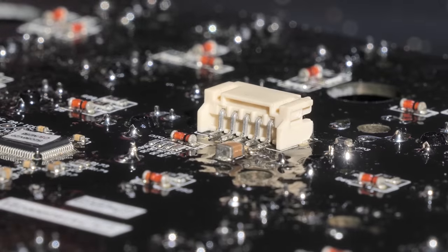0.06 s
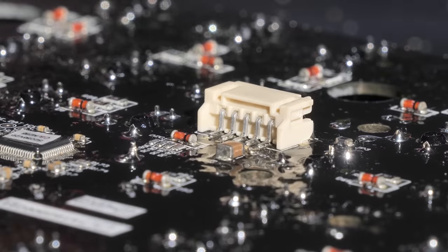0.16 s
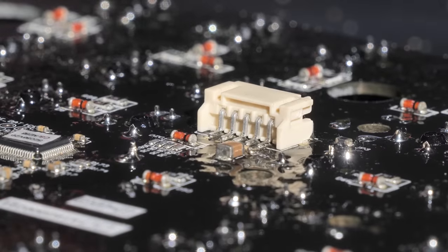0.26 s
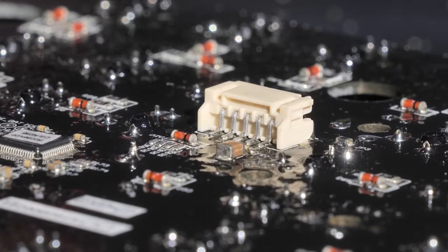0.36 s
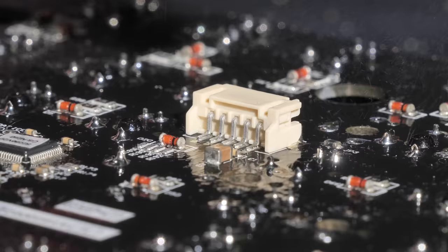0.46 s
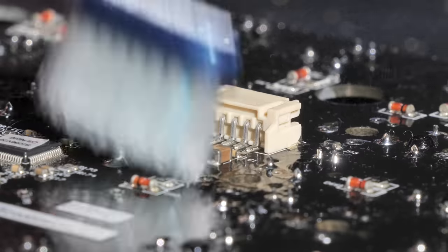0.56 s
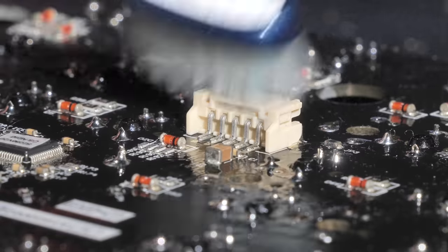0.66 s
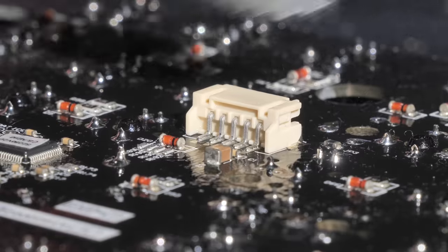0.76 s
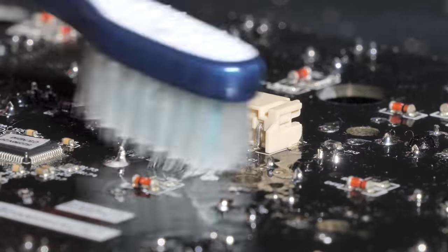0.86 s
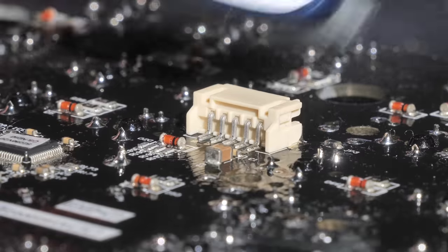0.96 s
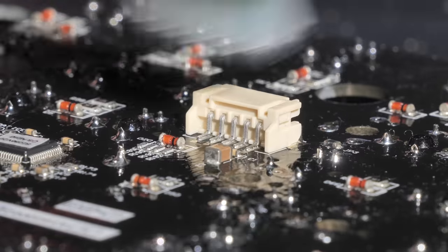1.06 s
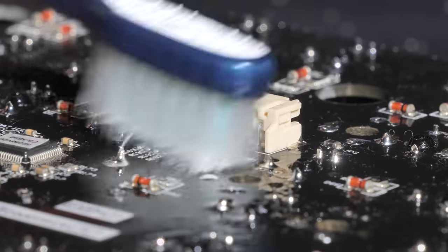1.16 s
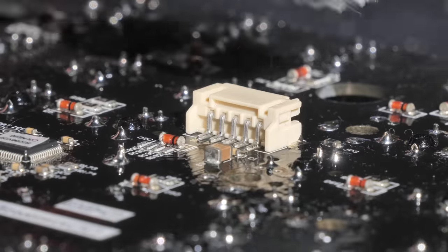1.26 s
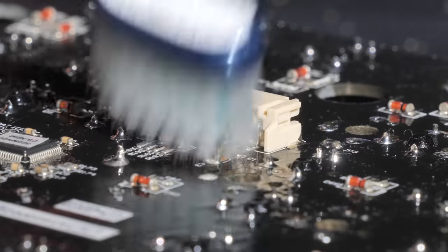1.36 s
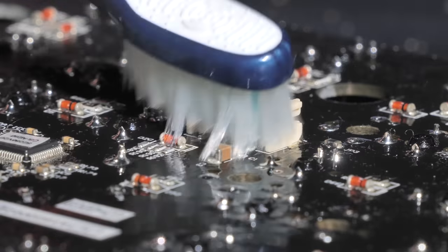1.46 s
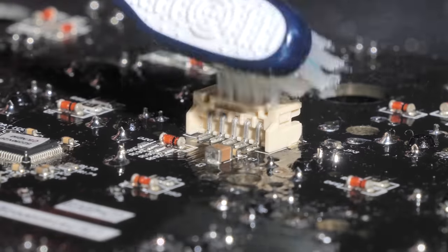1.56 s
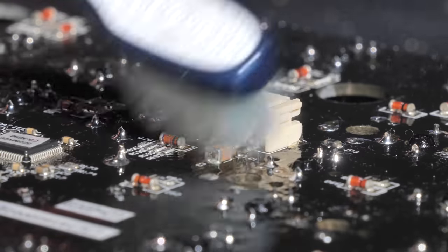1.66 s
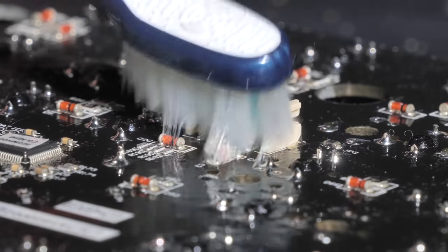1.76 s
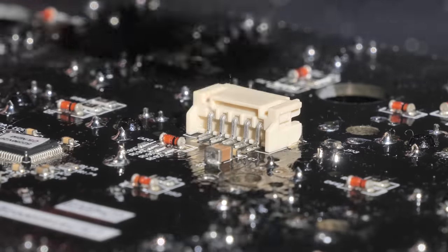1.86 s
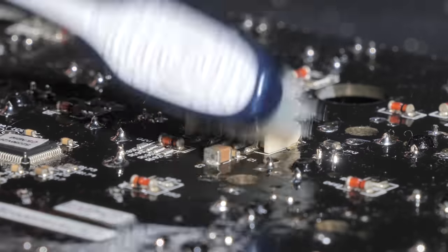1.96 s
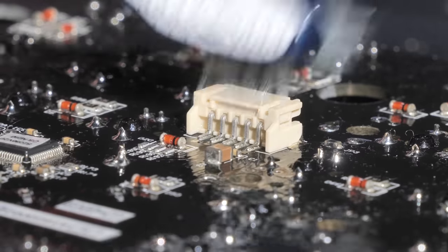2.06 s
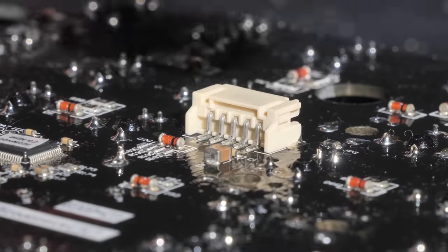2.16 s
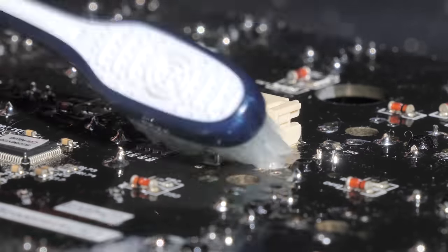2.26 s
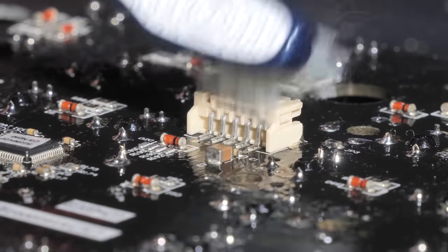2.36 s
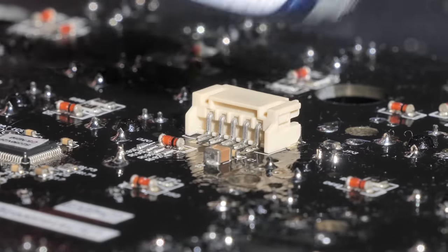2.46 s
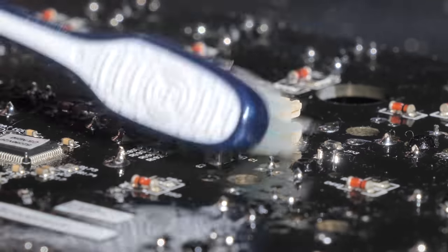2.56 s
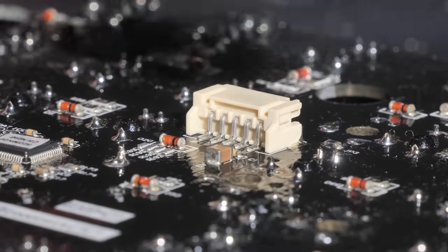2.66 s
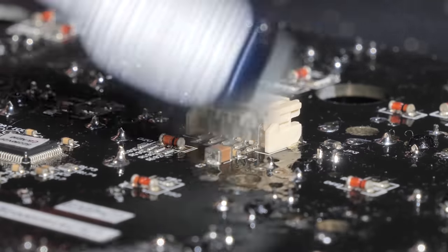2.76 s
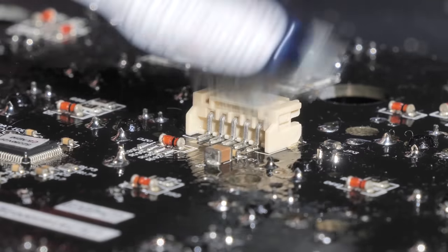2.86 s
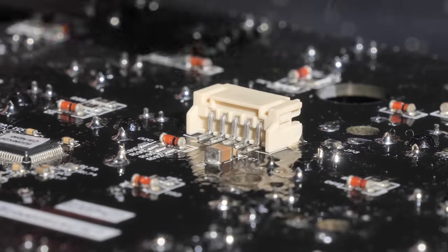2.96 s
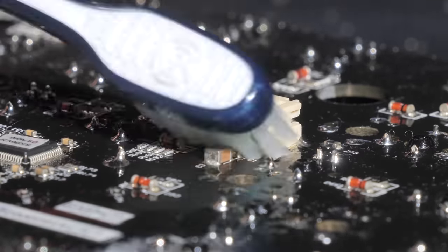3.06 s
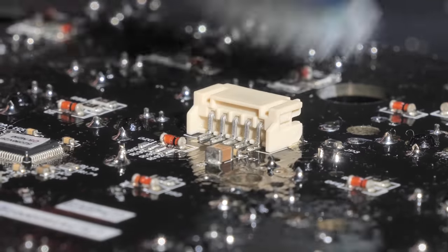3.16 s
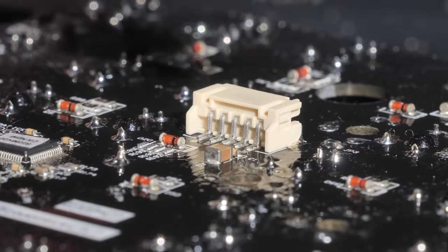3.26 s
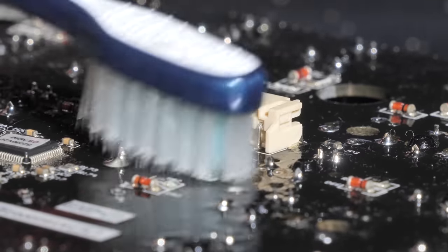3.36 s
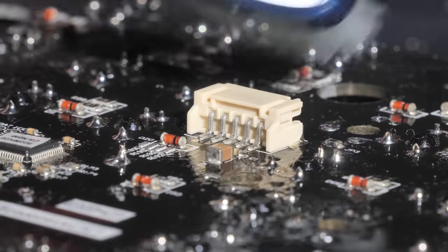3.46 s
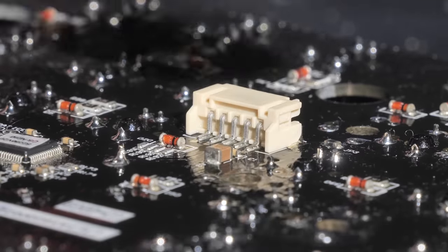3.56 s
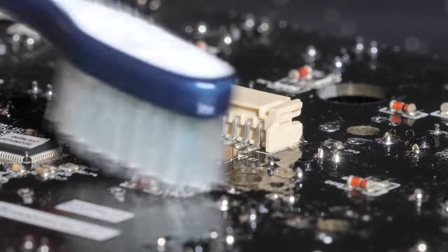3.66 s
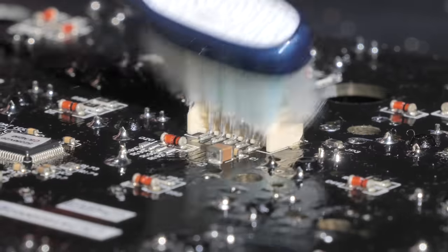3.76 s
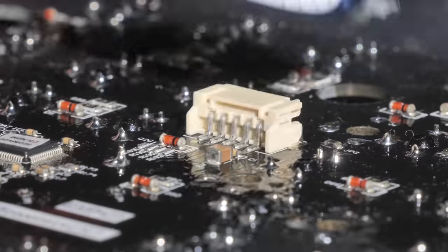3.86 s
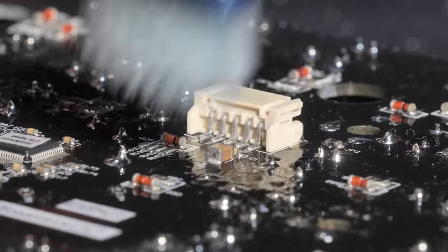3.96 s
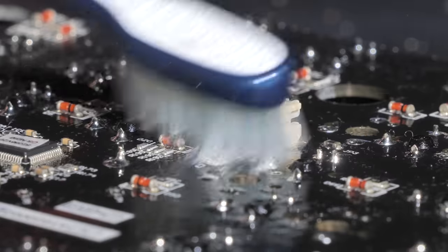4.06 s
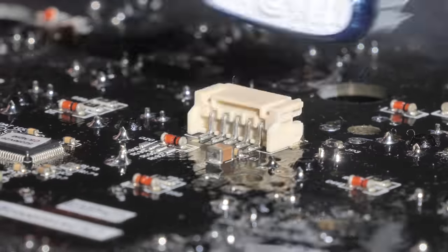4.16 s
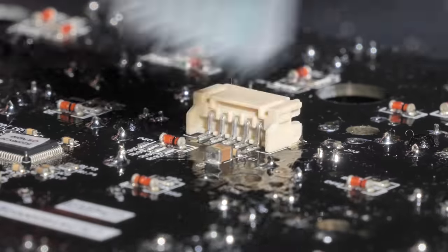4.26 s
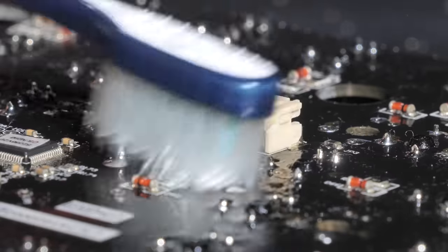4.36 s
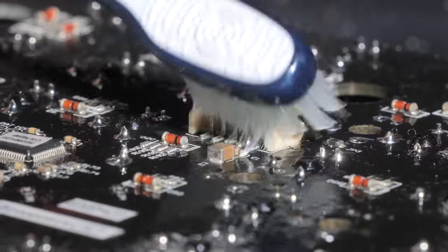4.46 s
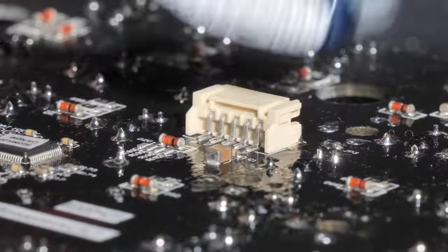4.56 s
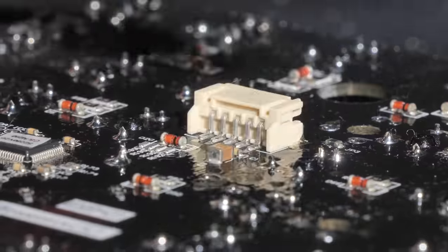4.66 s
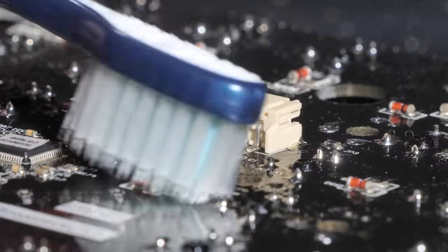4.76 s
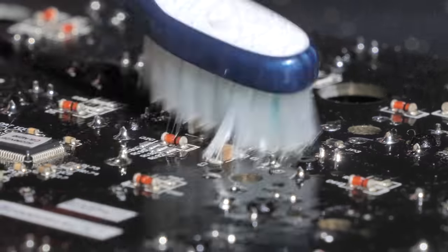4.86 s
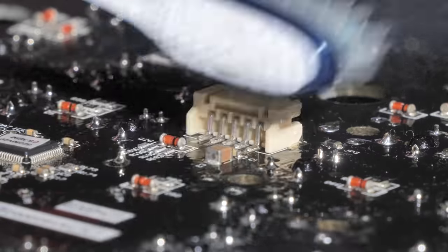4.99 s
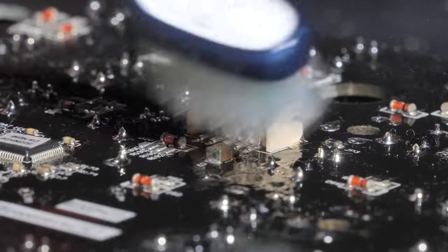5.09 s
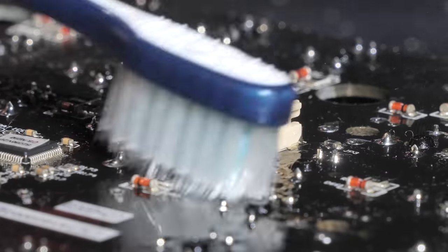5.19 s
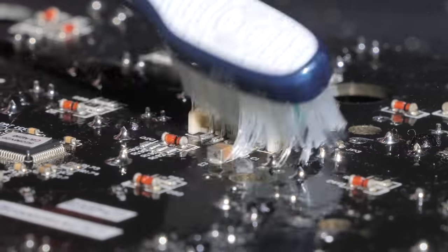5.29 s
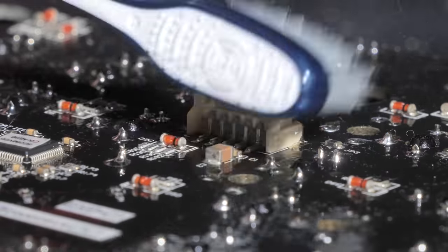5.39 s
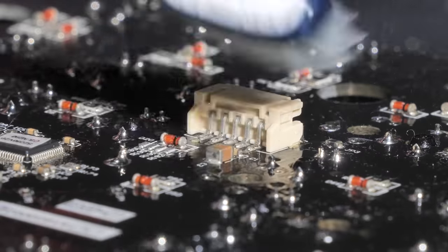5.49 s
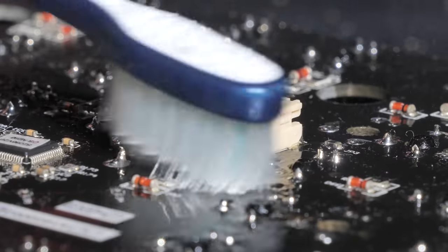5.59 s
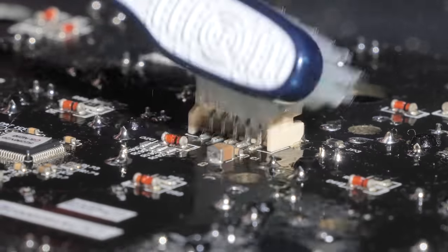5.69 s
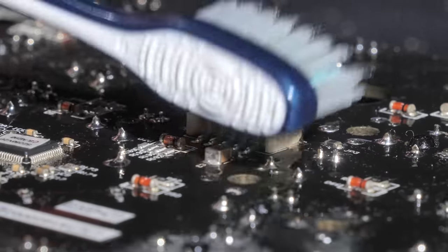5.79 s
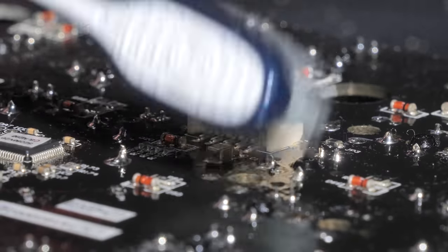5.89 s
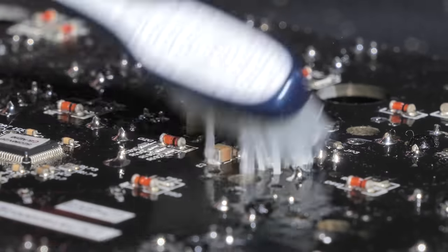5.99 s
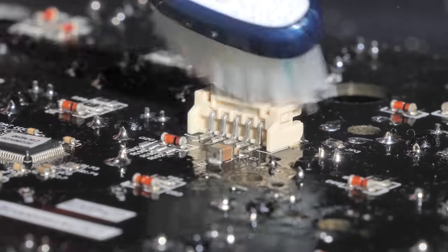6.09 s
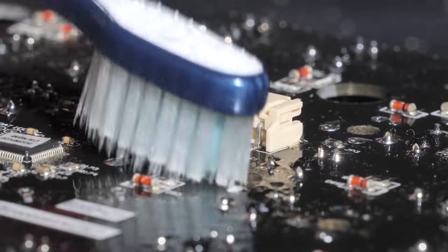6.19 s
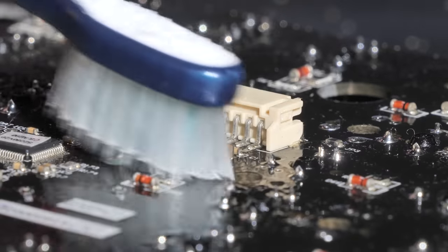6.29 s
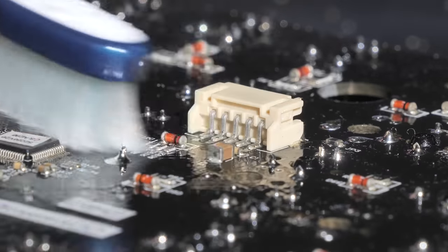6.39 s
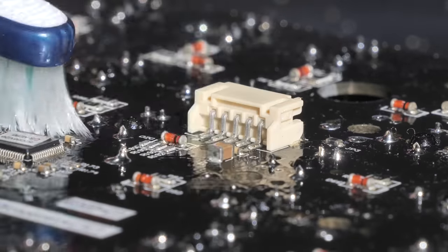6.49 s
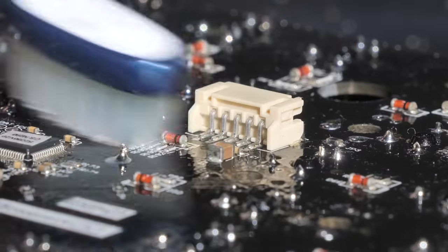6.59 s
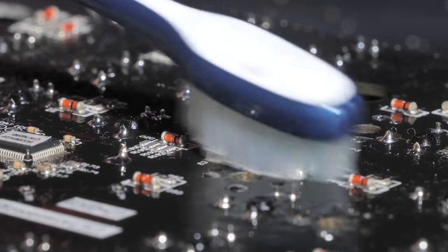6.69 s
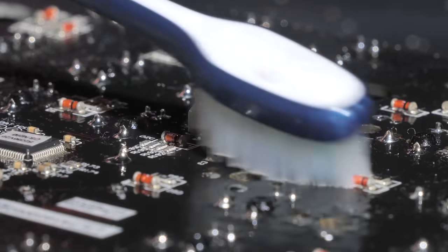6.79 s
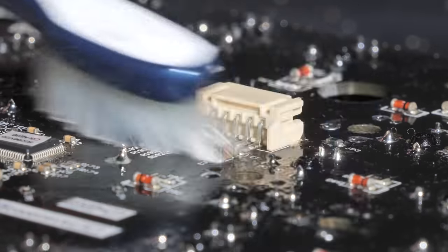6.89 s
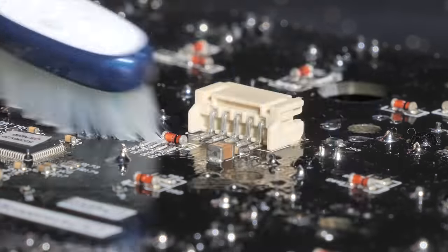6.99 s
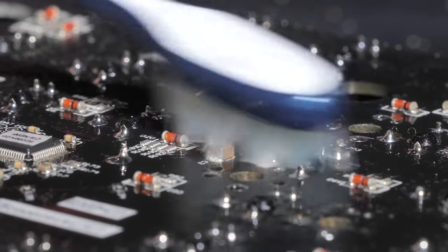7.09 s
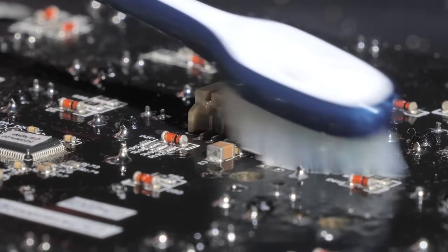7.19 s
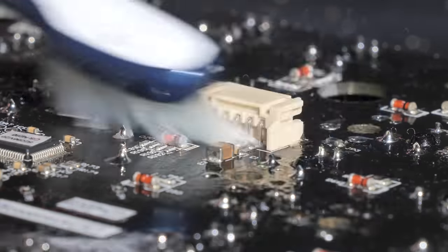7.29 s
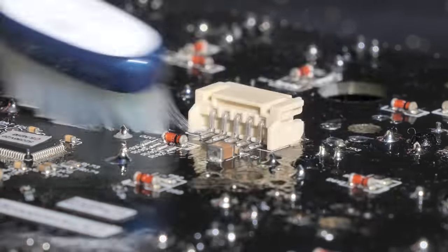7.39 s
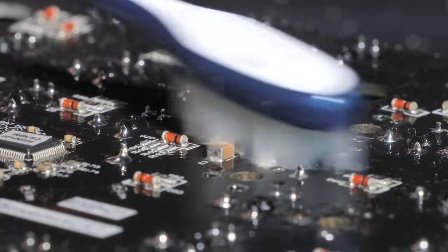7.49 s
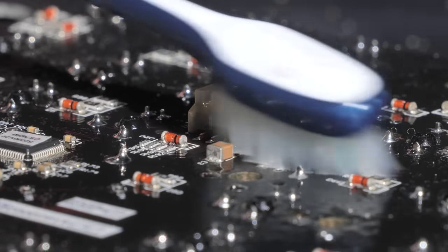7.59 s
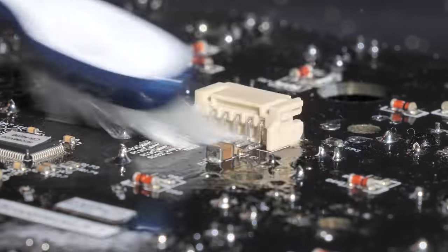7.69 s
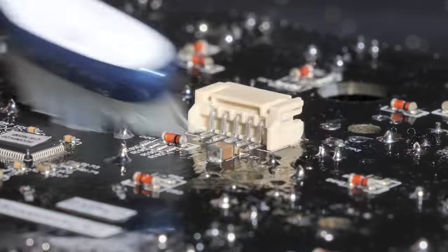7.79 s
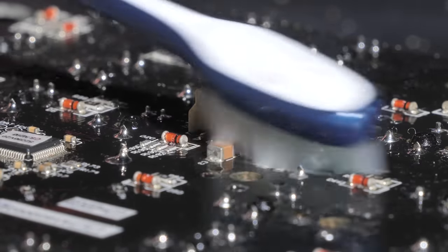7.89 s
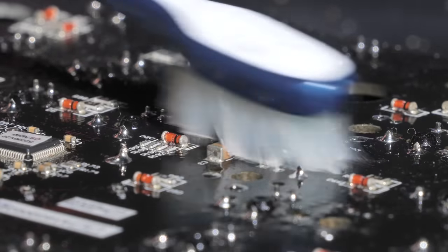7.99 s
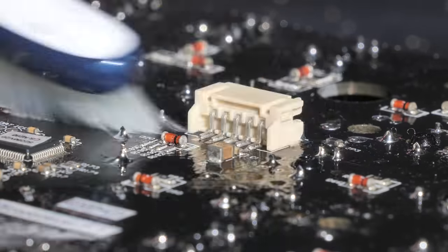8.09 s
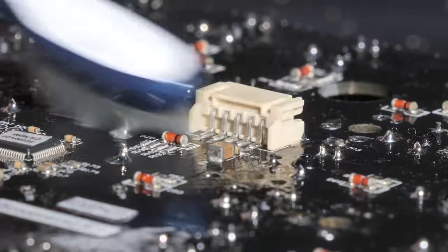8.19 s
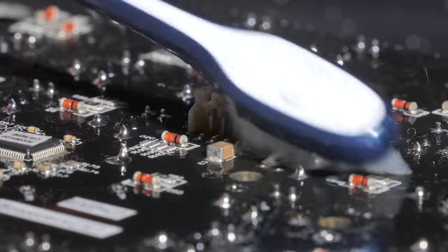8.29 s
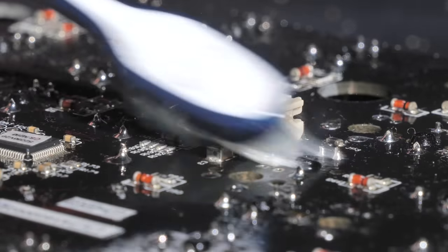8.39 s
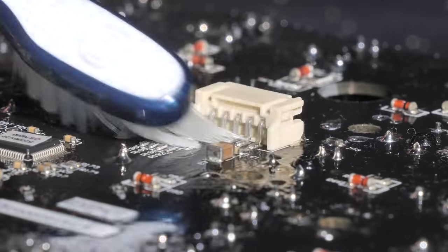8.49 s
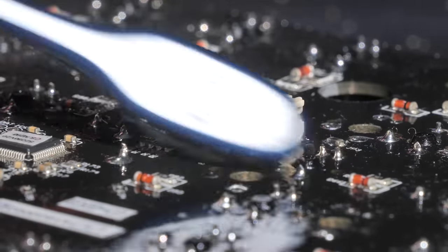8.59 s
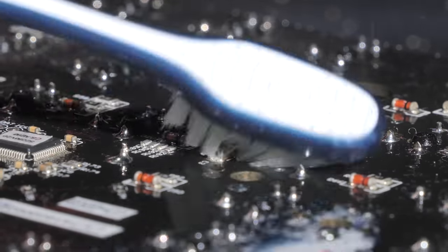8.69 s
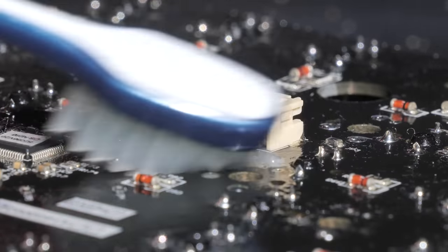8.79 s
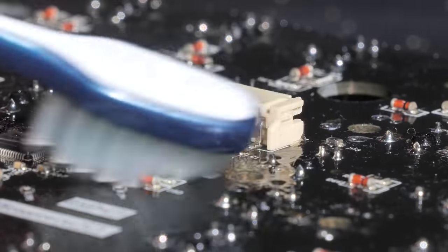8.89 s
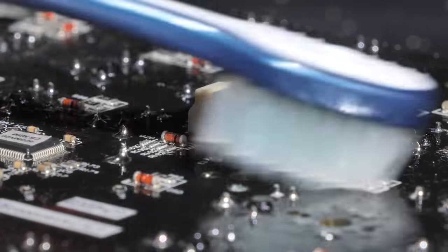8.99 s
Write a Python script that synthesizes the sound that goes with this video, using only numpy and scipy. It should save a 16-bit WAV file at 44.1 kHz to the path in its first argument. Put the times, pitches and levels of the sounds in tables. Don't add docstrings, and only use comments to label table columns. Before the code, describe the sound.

A toothbrush dabs a wet circuit board in short accelerating bristle swishes with crisp snaps, then scrubs quickly back and forth, very close.

```python
import sys
import numpy as np
from scipy import signal
from scipy.fft import rfft, irfft
from scipy.io import wavfile
from scipy.ndimage import uniform_filter1d

SR = 44100
rng = np.random.default_rng(int(sys.argv[2]) if len(sys.argv) > 2 else 0)


def volts_from_decibels(level):
    exponent = np.asarray(level, float) / 20
    return 10 ** exponent


def master(y):
    cut = np.clip(np.atleast_2d(y).T, -1, 1)
    pcm = np.round(cut * 32767)
    wavfile.write(sys.argv[1], SR, pcm.astype(np.int16))


N = 399105
TIME = np.arange(N) / SR

# pitch_hz, width_hz, level_db
BRISTLE_MODES = [(2487, 470, -10.5), (3500, 680, -2.5), (4530, 970, -3), (5225, 660, 0), (7316, 875, -0.5),
                 (8730, 1000, -3)]
TIP_MODES = [(9340, 1410, -2.5), (11220, 1200, 0.5), (12430, 1000, 1), (16000, 950, -2)]
BOARD_MODES = [(1308, 526, -7.5), (1400, 92, 2.5), (1594, 93, -0.5), (1808, 121, -1), (2300, 860, -11.5)]
BENCH_MODES = [(86, 17, -14.5), (142, 26.5, -5.5), (187.3, 17.5, 3), (217.4, 56, -5), (399, 95, -8.5),
               (540, 48, -14), (777, 325, -18.5)]


def brush():
    times_s, peak_db, board_db = tufts()
    fast, slow = walk(260), walk(60)
    dab_flutter_db = 4.07 * fast + 1.0 * slow
    scrub_flutter_db = 1.5 * fast + 0.5 * slow
    shared = snaps(3000, 5.1, wet=0.45)
    bodies = [
        (BRISTLE_MODES, 0.66, peak_db - 15, 0.0024, 0.00067, 0.46, 1.66),
        (TIP_MODES, 0.71, peak_db - 15, 0.0012, 0.0013, 0.89, 1.58),
        (BOARD_MODES, 0.79, peak_db + board_db - 9, 0.00024, 0.00166, 0.41, 0.72),
        (BENCH_MODES, 0.34, peak_db - 47, 0.00046, 0.026, 0.15, 2.4)]
    out = np.zeros(N)
    for body, dab, scrub in zip(bodies, dabs(), scrubs()):
        modes, flutter, tuft_db, rise_s, fall_s, common, patchy_db = body
        rub = level(common * shared + snaps(5000, 3.6, wet=0.71))
        drive = dab * volts_from_decibels(flutter * dab_flutter_db - 0.5)
        drive += scrub * volts_from_decibels(flutter * scrub_flutter_db)
        drive += bursts(times_s, tuft_db, rise_s, fall_s)
        out += ring(rub * drive, modes, patchy_db) / white_gain(modes)
    return out


# land_s, lift_s, first_hiss_db, last_hiss_db, pressure_db
DAB_STROKES = [(.45, .493, -60.5, -62, -11), (.65, .744, -59, -47.5, 6.5), (.914, 1.028, -60, -41, 4.5),
               (1.206, 1.303, -55.5, -42.5, 6.5), (1.449, 1.571, -54.5, -46.5, 3),
               (1.76, 1.876, -62, -42.5, 2.5), (2.07, 2.144, -50, -36.5, -6.5),
               (2.326, 2.452, -54, -40, -2), (2.626, 2.705, -57, -38, -2.5), (2.86, 2.95, -61, -41, 0),
               (3.126, 3.224, -70.5, -40.5, -3), (3.408, 3.529, -54.5, -45, 3.5),
               (3.733, 3.898, -52.5, -38, 0), (4.079, 4.226, -53, -39, 1.5), (4.396, 4.524, -53, -44, 2),
               (4.823, 5.007, -52, -48, -0.5), (5.25, 5.502, -48.5, -44, -3.5),
               (5.635, 5.695, -56.5, -43, 9), (6.018, 6.06, -71, -45.5, 6)]
TAP_STROKES = [
    (.283, .36, -53, -64.5, 0.5),
    (2.028, 2.062, -58.5, -75, -13),
    (2.59, 2.614, -63, -56, -10),
    (5.209, 5.228, -57, -56, 2),
    (5.994, 6.012, -47.5, -61, -1),
    (6.254, 6.314, -50.5, -66, 3.5),
]
ONWARD_STROKES = [
    (1.336, 1.376, -65, -73, 22),
    (1.577, 1.654, -45.5, -54, -1.5),
    (4.53, 4.628, -50.5, -39, 1),
    (5.013, 5.079, -46.5, -42.5, 0),
    (5.701, 5.884, -40.5, -53, 2),
    (6.066, 6.196, -42.5, -65, 1),
    (6.578, 6.66, -54.5, -61, 4),
    (8.697, 8.742, -49, -49, 15),
]
# landing_db, lifting_db, touch_bump_db, pressure_share
DAB_BODIES = [(1, 0, -6, 0.16), (-3.5, 4, -12.5, 0.00026), (1.5, -12.5, -8, 0.74), (1, -11, -18.5, 0.67)]
TAP_BODIES = [(2.5, 0, -8, -0.64), (-9, -4.5, -5, -1.1), (-3, -7, 3.5, 0.43), (-6.5, 0, -22, 1)]
ONWARD_BODIES = [(0, 1, -21, -0.13), (-1, 4.5, -22, -0.45), (-7.5, -15.5, -20, 1), (-6.5, -13, -20, 0.44)]


def dabs():
    return (drag_levels(DAB_STROKES, DAB_BODIES) + drag_levels(TAP_STROKES, TAP_BODIES)
            + drag_levels(ONWARD_STROKES, ONWARD_BODIES))


def drag_levels(strokes, bodies):
    touch_s, drag_bend, colour_bend = 0.0027, 0.17, 0.75
    release_s = 0.0055
    out = np.zeros((4, N))
    landing_db, lifting_db, bump_db, share = np.transpose(bodies)[:, :, None]
    for land_s, lift_s, first_db, last_db, pressure_db in strokes:
        on = slice(int(land_s * SR), int((lift_s + release_s) * SR))
        since_s = TIME[on] - land_s
        way = np.clip(since_s / (lift_s - land_s), 0, 1)
        hiss = volts_from_decibels(first_db * drag_bend) * (1 - way) + volts_from_decibels(last_db * drag_bend) * way
        hiss = hiss ** (1 / drag_bend)
        above_db = landing_db + (lifting_db - landing_db) * way ** colour_bend + share * pressure_db
        touch = 1 + volts_from_decibels(bump_db) * np.exp(-since_s / touch_s)
        out[:, on] += hiss * volts_from_decibels(above_db) * touch
    return out


# start_s, length_s, fastest_at (share 0-1), hiss_db, pressure_db
SCRUB_STROKES = [(0.377, .21, 0.2, -68, 1), (6.308, 0.3, 0.38, -47, 7.5), (6.6, 0.25, 0.6, -50, 2.5),
                 (6.858, .2, 0.56, -39, 4.5), (7.05, 0.21, 0.53, -41.5, 1), (7.253, 0.2, 0.55, -36, -0.5),
                 (7.443, 0.21, .62, -40, -1), (7.648, 0.2, 0.53, -36, -1), (7.834, 0.2, 0.57, -40.5, -1),
                 (8.027, 0.2, 0.51, -35.5, 1), (8.215, 0.19, 0.61, -37, -1),
                 (8.401, 0.18, 0.48, -35.5, -2.5), (8.568, 0.24, 0.35, -40, 0.5),
                 (8.787, 0.17, 0.39, -44.5, 3.5), (8.947, 0.11, 0.53, -51, 5.5)]
# full_speed_db, change_along_pull_db, push_to_pull_db, growth (power of speed), pressure_share
SCRUB_BODIES = [(-0.5, -2.5, -0.5, 1.71, -0.084), (.5, -0.5, -0.5, 1.84, -0.3), (-7.5, 9.5, 0, 1.62, 0.81),
                (-13, -4, -2.5, 1.3, 0.48)]


def scrubs():
    out = np.zeros((4, N))
    full_db, along_db, pull_db, growth, share = np.transpose(SCRUB_BODIES)[:, :, None]
    for k, (start_s, length_s, fastest, hiss_db, pressure_db) in enumerate(SCRUB_STROKES):
        on = slice(int(start_s * SR), int((start_s + length_s) * SR))
        way = np.interp((TIME[on] - start_s) / length_s, [0, fastest, 1], [0, 0.5, 1])
        speed = 0.077 + np.sin(np.pi * way)
        direction = -(-1) ** k
        above_db = full_db + direction * (pull_db + along_db * (way - 0.5)) + share * pressure_db
        out[:, on] += volts_from_decibels(hiss_db + above_db) * speed ** growth
    return out


# start_s, peak_db, board_ring_db (above the peak)
TUFT_LANDINGS = [(.652, -47, -12), (.9138, -51, 2), (1.2066, -28, -3), (1.4501, -34.5, -12),
                 (1.7489, -59, -19), (2.028, -44, -35), (2.07, -35, -31), (2.3241, -32, -19),
                 (2.5956, -23, -13), (2.6329, -29, -30), (2.872, -49, -18), (3.125, -37, -31),
                 (3.4095, -28.5, -7), (3.7334, -46.5, 4), (3.7402, -35, 9.5), (4.0858, -44, 15),
                 (4.396, -27, -3.5), (4.823, -34.5, 2), (5.2096, -42, -12), (5.6356, -23.5, -25),
                 (5.9946, -31, -10), (6.2533, -45, 0), (6.286, -38.5, 6)]
# start_s, peak_db
TUFT_CATCHES = [(0.927, -32), (1.482, -49), (1.5562, -20.5), (1.598, -32), (1.7893, -46), (1.806, -29),
                (2.0462, -35), (2.0827, -18), (2.3375, -22), (2.392, -32), (2.6526, -22), (2.8914, -28),
                (2.905, -21.5), (3.1426, -30), (3.749, -40), (3.822, -25), (4.17, -28), (4.4972, -22.5),
                (4.518, -19.5), (4.948, -23), (4.965, -20.5), (5.039, -27), (6.0642, -18.5),
                (6.0847, -24.5)]
# start_s, peak_db
TUFT_FLICKS = [(1.0077, -28), (1.023, -27), (1.2863, -19.5), (1.304, -20.5), (1.8736, -24), (2.1384, -8.5),
               (2.6886, -16), (2.7034, -12.5), (2.9478, -20.5), (3.1946, -33), (3.8891, -11.5),
               (3.893, -15), (3.896, -16), (4.202, -28), (4.2194, -11), (4.223, -15)]


def tufts():
    catches = [(*catch, -16) for catch in TUFT_CATCHES]
    flicks = [(*flick, -24.5) for flick in TUFT_FLICKS]
    return np.transpose([*TUFT_LANDINGS, *catches, *flicks])


def bursts(times_s, peaks_db, rise_s, fall_s):
    spikes = np.zeros(N)
    spikes[(times_s * SR).astype(int)] = volts_from_decibels(peaks_db)
    t = TIME[:SR // 10]
    shape = np.exp(-t / fall_s) * (1 - np.exp(-t / rise_s))
    return signal.fftconvolve(spikes, shape / shape.max())[:N]


def snaps(per_s, spread_db, wet):
    slips = rng.random(N) < per_s / SR
    sizes = volts_from_decibels(spread_db * np.minimum(rng.exponential(size=N), 4))
    signs = np.sign(rng.standard_normal(N))
    return level(level(slips * sizes * signs) + wet * rng.standard_normal(N))


def ring(x, modes, patchy_db):
    out = np.zeros(N)
    for k, (hz, width_hz, db) in enumerate(modes):
        b, a = signal.iirpeak(hz, hz / width_hz, SR)
        fed = x * volts_from_decibels(patchy_db * walk(45))
        out += (-1) ** k * volts_from_decibels(db) * signal.lfilter(b, a, fed)
    return out


def white_gain(modes):
    _, width_hz, db = np.transpose(modes)
    return np.sqrt(np.sum(volts_from_decibels(db) ** 2 * np.pi * width_hz / SR))


def walk(rate_hz):
    place = TIME * rate_hz
    step = place.astype(int)
    ramp = 0.5 - 0.5 * np.cos(np.pi * (place - step))
    levels = rng.standard_normal(step[-1] + 2)
    return (levels[step] * (1 - ramp) + levels[step + 1] * ramp) / np.sqrt(0.75)


def level(x, db=0):
    return x * volts_from_decibels(db) / np.sqrt(np.mean(x ** 2))


# start_s, peak_db, pitch_hz, crack_db (above the ring)
HANDLE_KNOCKS = [(0.678, -43.5, 1560, 16), (1.076, -55.5, 2200, 8), (1.3352, -39.5, 2300, -14),
                 (1.340, -43, 2600, -21), (1.343, -37, 1240, -16), (1.346, -42, 1170, -20),
                 (1.352, -39.5, 1350, -16), (1.358, -38, 1220, -24), (1.366, -42, 1780, -18),
                 (1.373, -43, 1210, -24), (5.898, -51.5, 2900, 6), (8.608, -34, 2680, -12),
                 (8.69, -18.5, 1760, -21), (8.696, -33, 770, -20), (8.704, -23, 2300, 0),
                 (8.712, -27, 2700, -10), (8.72, -28, 1770, -21), (8.728, -32, 2530, -11),
                 (8.735, -33, 2300, -11), (8.759, -41, 2850, -10), (8.777, -26.5, 2800, 10.5),
                 (8.777, -37, 600, -30)]
# start_s, peak_db, pitch_hz
HEAD_THUMPS = [(.01, -62, 69.6), (.294, -33.5, 348), (.296, -38.5, 83.5), (.306, -36, 297),
               (0.679, -43.5, 48.3), (1.222, -57, 50), (2.692, -53, 48.5), (3.42, -58, 44.7),
               (4.409, -59, 58.7), (5.649, -58, 45.2), (.935, -44, 404), (.953, -45, 383),
               (1.809, -45.5, 190), (2.365, -45, 215), (2.914, -46.5, 184), (2.939, -46, 181),
               (3.413, -41.5, 183), (4.53, -42, 418), (.3, -47, 520), (6.72, -52, 215), (7.125, -45, 206),
               (7.165, -45, 217), (7.51, -42, 210), (7.55, -45, 200), (7.9, -49, 190), (8.3, -45, 200),
               (8.335, -45, 215), (8.735, -42, 520)]


def knocks():
    hits = [(start_s, db, hz, 11 / hz, -29) for start_s, db, hz in HEAD_THUMPS]
    hits += [(start_s, db, hz, 0.012, crack_db) for start_s, db, hz, crack_db in HANDLE_KNOCKS]
    t = TIME[:SR // 10]
    out = np.zeros(N + len(t))
    for start_s, db, hz, t60_s, crack_db in hits:
        ratios = 1.01 + 2.08 * rng.random((3, 1))
        decay = np.exp(-np.log(1000) * t / t60_s)
        overtones = np.sin(2 * np.pi * ratios * hz * t).sum(axis=0)
        tone = decay * np.sin(2 * np.pi * hz * t) + 0.22 * decay ** 2 * overtones
        grit = uniform_filter1d(rng.standard_normal(len(t)), size=3)
        crack = volts_from_decibels(crack_db) * grit * np.exp(-t / 0.00088)
        out[int(start_s * SR):][:len(t)] += volts_from_decibels(db) * (tone + crack)
    return out[:N]


def room(x, t60_s, wet_db, dull):
    t = TIME[:SR // 2]
    tail = rng.standard_normal(len(t)) * np.exp(-np.log(1000) * t / t60_s)
    tail *= t > 0.004
    tail = signal.lfilter([1], [1, -min(dull, 0.95)], tail)
    return volts_from_decibels(wet_db) * signal.fftconvolve(x, tail / np.linalg.norm(tail))[:N]


# pitch_hz, level_db (per Hz)
HUM_SPECTRUM = [(15, -62), (25, -1.5), (180, 0), (354, -1.5), (624, -12.5), (734, -8), (1040, -17.5),
                (1440, -18), (2050, -19), (3340, -23), (8830, -22), (12200, -21.5), (16000, -27.5)]


def hum():
    hz = np.arange(N // 2 + 1) * SR / N + 1
    spectrum_hz, spectrum_db = np.transpose(HUM_SPECTRUM)
    colour = volts_from_decibels(np.interp(np.log(hz), np.log(spectrum_hz), spectrum_db))
    noise = level(irfft(colour * rfft(rng.standard_normal(N)), N), -67)
    low = signal.sosfilt(signal.butter(1, 600, fs=SR, output="sos"), noise)
    return noise + low * (volts_from_decibels(2.8 * walk(6)) - 1)


def scene():
    dry = brush() + knocks()
    mono = dry + room(dry, t60_s=0.049, wet_db=-16.5, dull=0.58) + hum()
    return np.array([mono, mono])


def gate(x, open_db, hold_s, fade_s, depth_db):
    high = signal.sosfilt(signal.butter(2, 900, "high", fs=SR, output="sos"), x[0])
    power = uniform_filter1d(np.diff(high, prepend=0) ** 2, size=128)
    loud = power > volts_from_decibels(open_db) ** 2
    quiet_s = TIME - np.maximum.accumulate(TIME * loud)
    closed = np.clip((quiet_s - hold_s) / fade_s, 0, 1)
    return x + high * (volts_from_decibels(depth_db * closed) - 1)


def roll_off(x):
    return signal.sosfilt(signal.butter(12, 17100, fs=SR, output="sos"), x)


def record(dry):
    gated = gate(dry, open_db=-54, hold_s=0.085, fade_s=0.045, depth_db=-9)
    band_limit = signal.ellip(10, 0.3, 60, 15720, fs=SR, output="sos")
    return roll_off(signal.sosfilt(band_limit, gated))


dry = scene()
out = record(dry)
master(out)
```